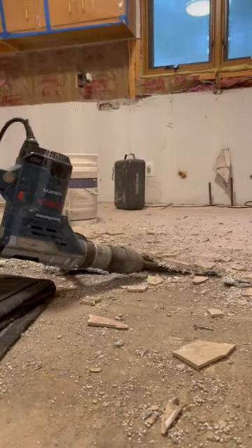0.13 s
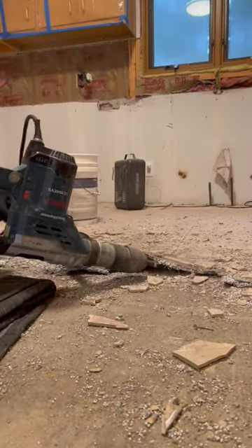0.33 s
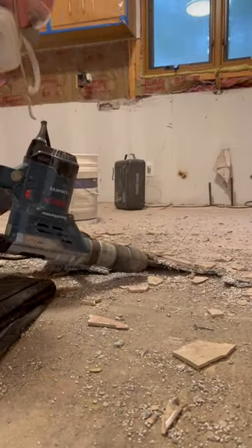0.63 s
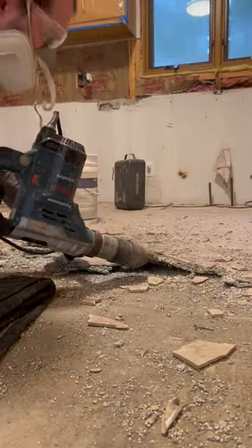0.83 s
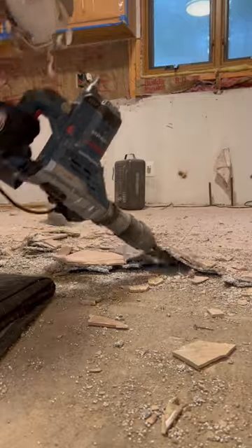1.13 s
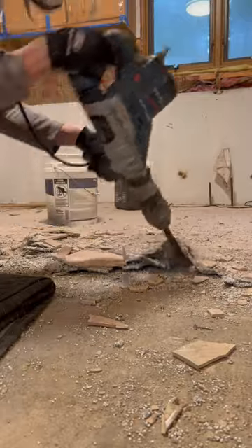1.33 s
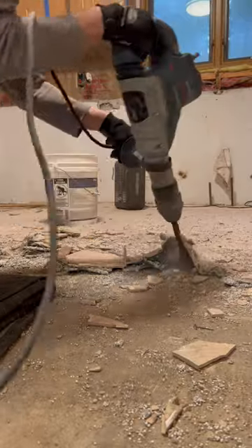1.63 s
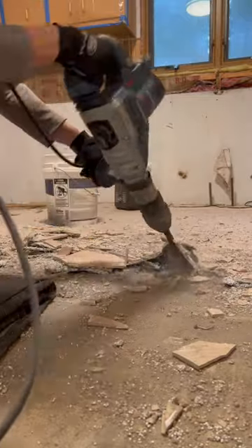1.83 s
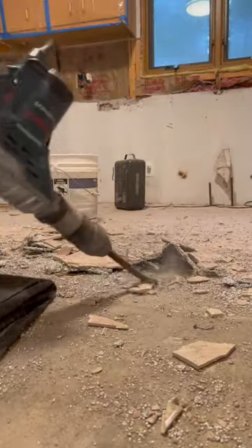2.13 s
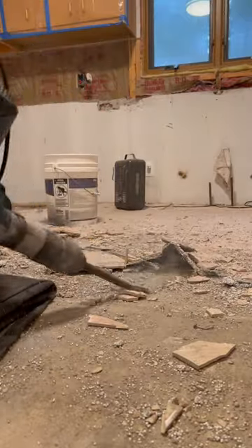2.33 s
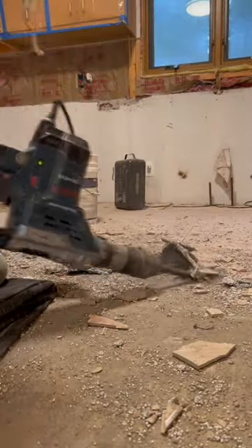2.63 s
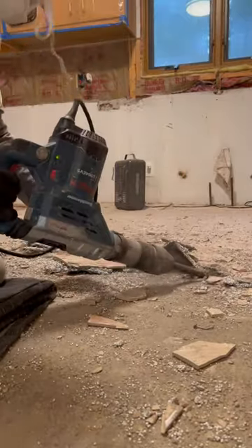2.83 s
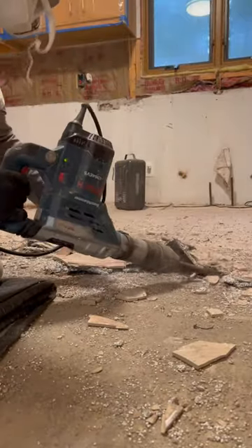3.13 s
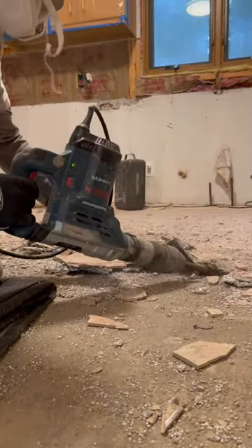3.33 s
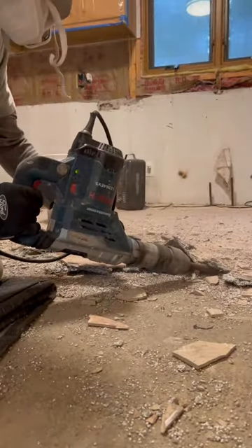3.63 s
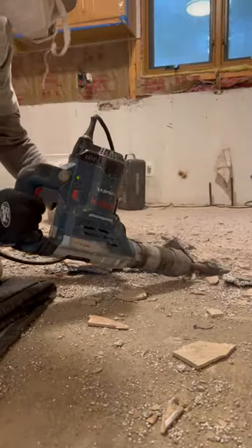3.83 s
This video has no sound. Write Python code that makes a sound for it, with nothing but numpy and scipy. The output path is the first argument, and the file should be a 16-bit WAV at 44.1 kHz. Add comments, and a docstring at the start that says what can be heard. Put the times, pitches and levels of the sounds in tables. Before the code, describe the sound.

Electric chipping hammer clatters in fast metallic bursts on a tiled floor, its motor rushing throughout.

```python
"""Four bursts of hard clatter, about 47 blows a second: an electric demolition hammer chisels tile in a bare room.
Each blow excites low floor modes, a filtered knock on the tile with buzzing loose pieces, and a steel chisel
that clanks, cracks and rings. Underneath, the motor runs throughout as filtered air noise and whining tones.
Slabs thud and shards snap as decaying tones and noise; before the second burst the chisel drags over rubble."""
import sys
import numpy as np
from scipy import signal
from scipy.fft import rfft, irfft
from scipy.io import wavfile
from scipy.ndimage import uniform_filter1d

SR = 44100
rng = np.random.default_rng(int(sys.argv[2]) if len(sys.argv) > 2 else 0)


def dump(signal):
    """Clip the signal to [-1, 1] and save it as 16-bit WAV at the path in sys.argv[1]."""
    limited = np.clip(np.atleast_2d(signal).T, -1, 1)
    pcm = np.round(limited * 32767).astype(np.int16)
    wavfile.write(sys.argv[1], SR, pcm)


N = 176400
TIME = np.arange(N) / SR
ROOM_T60_S = 0.25

# Hammer speed. Each row: time in seconds, blows per second.
SPEED = [(0.0, 47.7), (0.42, 46.84), (0.52, 48.44), (0.7, 48.5), (1.0, 47.3), (1.53, 47.01), (1.6, 49.61),
         (1.72, 45.76), (1.92, 44.93), (2.1, 48.4), (2.72, 45.86), (2.79, 49.19), (2.88, 45.55),
         (3.3, 47.27), (3.58, 46.93), (3.72, 49.79), (3.83, 50.39), (3.94, 44.22)]
# Strength of the blows, ahead of the mix gain of each part. Each row: time in seconds, floor thump in dB,
# tile knock in dB, chisel in dB, tip crack in dB.
EFFORT = [(0.01, -47.5, -37, -31, -37), (0.455, -49, -41, -35, -31.5), (1.574, -29, -28, -30.5, -24.5),
          (1.656, -19, -25, -31.5, -30), (1.677, -35.5, -29, -30.5, -54), (1.963, -36, -43.5, -35, -43),
          (2.683, -52, -36.5, -32, -27.5), (2.73, -35, -31.5, -34, -27), (2.87, -23, -23, -30.5, -22),
          (3.2, -24.5, -22.5, -26, -25), (3.326, -33, -27.5, -32.5, -25.5), (3.347, -56, -27.5, -50, -52),
          (3.39, -53, -35, -33.5, -29), (3.411, -38.5, -29.5, -29, -20.5), (3.58, -40, -30, -30.5, -26),
          (3.68, -50, -35, -49, -30), (3.766, -42, -29, -32, -23.5), (3.89, -34, -25, -31, -20.5),
          (3.953, -29, -26.5, -32, -28)]


def amp(db):
    """Decibels to gain."""
    return 10 ** (np.asarray(db) / 20)


def unit(x):
    """Scales to rms 1."""
    return x / np.sqrt(np.mean(x ** 2))


def curve(table, t=TIME, order=1):
    """Reads one column of a table along its first, in straight lines between rows."""
    rows = np.array(table, float)
    return np.interp(t, rows[:, 0], rows[:, order])


def convolve(x, response):
    """Filters and cuts to the scene's length."""
    return signal.fftconvolve(np.atleast_2d(x), np.atleast_2d(response), axes=1)[:, :N]


def colour(x, points, size=4096):
    """Minimum-phase filter of energy 1 whose spectrum follows the given points."""
    hz, db = np.transpose(points)
    log_hz = np.log(abs(np.fft.fftfreq(size, 1 / SR)) + 1)
    gain = amp(np.interp(log_hz, np.log(hz), db))
    spectrum = np.exp(np.conj(signal.hilbert(np.log(gain))))
    response = np.fft.ifft(spectrum).real[:size // 2]
    return convolve(x, response / np.linalg.norm(response))


def band(x, hz, width_hz):
    """A steep resonance, scaled to rms 1."""
    detuning = (np.fft.rfftfreq(N, 1 / SR) - hz) / width_hz
    return unit(irfft(rfft(x) / (1 + 1j * detuning) ** 2, N))


def pair(side=0.12):
    """Noise at two microphones; side is the part that they do not share."""
    a, b = rng.standard_normal((2, N))
    return unit(np.array([a + side * b, a - side * b]))


def reverb(x, wet_db, side=0.41, t60=ROOM_T60_S):
    """Direct sound plus a diffuse, exponentially dying tail, scaled back for the added power."""
    tail = (pair(side) * amp(-60 * TIME / t60))[:, :SR // 2]
    tail *= amp(wet_db) / np.linalg.norm(tail[0])
    tail[:, 0] = 1  # direct sound
    return convolve(x, tail) / np.sqrt(1 + amp(wet_db) ** 2)


def floor_echo(x):
    """Adds the reflection off the floor, whose comb of peaks sweeps as the hammer is raised and lowered."""
    # First peak of the comb as the vents swing over the floor. Each row: time in seconds, frequency in Hz.
    swing = [(1.05, 2047), (1.4, 1393), (2.15, 1435), (2.65, 1845)]
    echo_db = -9
    late = [np.interp(TIME - 1 / curve(swing), TIME, channel) for channel in x]
    return unit(x + amp(echo_db) * np.array(late))


def motor():
    """Cooling air rushes through the vents; the heavy rotor whines smoothly; the piston shakes the housing."""
    # Colour of the cooling air. Each row: frequency in Hz, relative level in dB per Hz.
    rush = [(25, -30.5), (700, -10.5), (1700, -3), (6000, -5), (10200, -10.5), (12000, -26)]
    # Motor levels. Each row: time in seconds, rush in dB, fan in dB (the fan noise is then halved).
    motor_levels = [(.4, -34.5, -53), (.52, -35, -45.5), (1.05, -34.5, -37.5), (1.25, -35, -43),
                    (2.15, -33, -47.5), (3, -32, -36), (3.8, -32.5, -41)]
    # Motor tones. Each row: multiple of the shaft speed, level in dB relative to the fan column.
    whine_tones = [(1, -20.5), (7, -1)]
    # Shaking of the housing at the stroke rate. Each row: time in seconds, level in dB.
    shake = [(.9, -62), (1.38, -40.5), (2.2, -63), (3.05, -48), (3.4, -73)]
    shaft_per_blow, gear_order, gear_db = 6.24, 17, -54  # shaft turns per blow; gear tone per shaft turn

    # The rotor's inertia smooths the speed over a fifth of a second
    turns = np.cumsum(uniform_filter1d(curve(SPEED), size=SR // 5)) / SR
    stroke = np.sin(2 * np.pi * turns)
    fan_gain = amp(curve(motor_levels, order=2))

    air = floor_echo(colour(pair(side=0.49), rush))
    air = air * (1 + 0.15 * stroke) * amp(curve(motor_levels))
    air += band(pair(), hz=1940, width_hz=95) * fan_gain / 2

    wobble = 0.0036 * band(rng.standard_normal(N), hz=6.5, width_hz=15)  # shaft turns
    shaft = shaft_per_blow * turns + wobble
    whine = sum(amp(db) * np.sin(2 * np.pi * round(k) * shaft) for k, db in whine_tones) * fan_gain
    whine += amp(gear_db) * np.sin(2 * np.pi * gear_order * shaft)
    shaking = amp(curve(shake)) * stroke
    return air + np.sqrt(2) * (reverb(whine, wet_db=-7.5) + shaking)  # root 2: tone levels are rms


def rubble():
    """Slabs thud as they break loose, shards snap, and the chisel drags between them."""
    # Slabs breaking loose. Each row: start in seconds, level in dB, pitch in Hz, t60 in seconds.
    thuds = [(1.656, -5, 281, 0.033), (1.661, -15, 106, 0.13), (3.183, -25, 74, 0.12),
             (3.331, -7, 257, 0.018)]
    # Snapping and scraping of shards. Each row: start in seconds, onset level in dB, centre in Hz,
    # decay in seconds (to 1/e).
    shards = [(1.097, -31, 1020, 0.016), (1.279, -35, 1200, 0.12), (1.655, -2.5, 720, 0.0021),
              (1.654, -15, 3000, 0.0013), (3.887, -15.5, 1220, 0.0042)]
    # Chisel dragged through rubble. Each row: start in seconds, end in seconds, level in dB.
    drags = [(1.085, 1.561, -45.5)]
    out = np.zeros(N)
    for start, db, hz, t60 in thuds:
        t = np.maximum(TIME - start, 0)
        out += amp(db - 60 * t / t60) * np.sin(2 * np.pi * hz * t)
    for start, db, hz, decay in shards:
        t = np.maximum(TIME - start, 0)
        snap = (t > 0) * np.exp(-t / decay)
        out += amp(db) * snap * band(rng.standard_normal(N), hz, hz)
    impacts = rng.standard_normal(N) * (rng.random(N) < 250 / SR)  # about 250 grains a second
    grains = band(impacts, hz=272, width_hz=320)
    for start, end, db in drags:
        out += amp(db) * grains * ((TIME > start) & (TIME < end))
    return reverb(out, wet_db=-13.0)


def blow_times(turns):
    """One blow per piston stroke while the chisel is pressed down."""
    # Bursts of blows. Each row: first blow in seconds, end in seconds.
    bursts = [(.0102, .465), (1.5735, 1.955), (2.6826, 3.632), (3.7052, 3.962)]
    times = []
    for burst in bursts:
        first, last = np.interp(burst, TIME, turns)
        times.append(np.interp(np.arange(first, last), turns, TIME))
    return np.concatenate(times)


def clicks(times, order):
    """One impulse per blow, as strong as a column of EFFORT asks, with 1 dB of random scatter."""
    db = curve(EFFORT, times, order=order) + rng.standard_normal(len(times))
    per_blow = np.sqrt(SR / curve(SPEED, times))  # turns an rms level into an impulse height
    return np.bincount((times * SR).astype(int), amp(db) * per_blow, N)[:N]


def contact(hits, decay_s, grit):
    """A clean impact and a short spray of crushing grit; grit is the spray's share of the power."""
    t = TIME[:SR // 20]
    shape = t * np.exp(-2 * t / decay_s)
    power = abs(convolve(hits ** 2, shape / shape.sum()))
    return np.sqrt(1 - grit) * hits + np.sqrt(grit * power) * pair(side=0.43)


def floor_thump(times):
    """The floor booms in its low modes, each a decaying sine."""
    # Floor modes. Each row: frequency in Hz, relative level in dB, t60 in seconds.
    floor_modes = [(146.5, 10, 0.18), (199, 7.5, 0.18), (275.9, -1, 0.49)]
    boom = sum(amp(db - 60 * TIME / t60) * np.sin(2 * np.pi * hz * TIME) for hz, db, t60 in floor_modes)
    thump = convolve(clicks(times, order=1), -boom / np.linalg.norm(boom))
    return amp(-0.5) * reverb(thump, wet_db=-11, side=0.05)


def tile_knock(times):
    """The dull knock of the tip on tile and mortar; loose pieces buzz at their own pitch."""
    # Colour of the knock. Each row: frequency in Hz, relative level in dB per Hz.
    knock_colour = [(90, -27.5), (430, 1.5), (700, 6.5), (1400, -7.5), (2100, -5.5), (12000, -75.5)]
    # Loose pieces of tile buzzing under the tip. Each row: start in seconds, end in seconds, pitch in Hz.
    tiles = [(0, .42, 1157), (0, .45, 263), (1.55, 1.93, 583), (1.66, 1.93, 3840), (3.4, 3.63, 1980),
             (3.4, 3.63, 582), (3.74, 3.86, 438)]
    tile_db, decay_cycles = -4, 1.27
    hits = clicks(times + 0.00055, order=2)
    knock = colour(contact(hits, decay_s=0.0038, grit=0.2), knock_colour)
    for start, end, hz in tiles:
        cycles = hz * TIME
        buzz = cycles * np.exp(-cycles / decay_cycles) * np.sin(2 * np.pi * cycles)
        loose_hits = hits * (TIME > start) * (TIME < end)
        knock = knock + amp(tile_db) * convolve(loose_hits, buzz / np.linalg.norm(buzz))
    balance = amp([[-1], [1.3]])  # left, right
    return balance * reverb(knock, wet_db=0.5, side=0.48, t60=0.16)


def clang(times):
    """Each blow sets the chisel's modes swelling and dying within milliseconds, more so when it bites the floor."""
    # Lengthwise modes of the chisel. Each row: frequency in Hz, level in dB, swell in seconds.
    steel = [(4550, 1, 0.0004), (8330, -3, 0.00055)]
    bite = 0.17  # extra clang in dB per dB of floor thump
    out, t, thump_db = np.zeros(N), TIME[:SR // 50], curve(EFFORT)
    hits = clicks(times, order=3) * amp(bite * (thump_db - thump_db.mean()))
    for hz, db, swell in steel:
        shape = t ** 2 * np.exp(-t / swell)
        envelope = convolve(hits, shape / np.linalg.norm(shape))[0]
        wander = 1.28 * band(rng.standard_normal(N), hz=0, width_hz=150)  # radians
        phase = 2 * np.pi * hz * TIME + wander
        out += amp(db) * envelope * np.sqrt(2) * np.sin(phase)
    return out


def chisel(times):
    """The steel clangs, cracks at the tip and rings on as it rebounds; it reaches the left side a sample late."""
    # Colours of the steel's clank, the tip's crack and the ring.
    # Each row: frequency in Hz, relative level in dB per Hz.
    clank_colour = [(1000, -13.5), (2600, -0.5), (4550, -2), (5200, -29), (13000, -38)]
    crack_colour = [(2500, -25), (6650, -12), (7150, -1), (7700, 1.5), (10400, -13), (12000, -34),
                    (15800, -21)]
    ring_colour = [(7000, -25.5), (8050, -13), (8500, 0.5), (9000, -21.5), (11000, -61)]
    ring_t60_s, rebound_s, rebound_db = 0.49, 0.009, -14
    rebounds = times + rebound_s * (1 + 0.074 * rng.standard_normal(len(times)))
    hits = clicks(times, order=3) + amp(rebound_db) * clicks(rebounds, order=3)
    tip_hits = clicks(times, order=4)

    clank = colour(contact(hits, decay_s=0.0027, grit=1), clank_colour)
    crack = colour(contact(tip_hits, decay_s=0.0013, grit=0.79), crack_colour)
    ring = colour(contact(hits, decay_s=0.0022, grit=0.46), ring_colour)
    ring = reverb(ring, wet_db=5, t60=ring_t60_s)
    strike = reverb(amp(-4) * clank + amp(2.5) * crack, wet_db=-4.5)
    modes = reverb(clang(times - 0.0006), wet_db=-3.5)  # early, as the modes take time to swell
    left, right = strike + modes + amp(6.5) * ring
    return np.array([np.roll(left, 1), right])


def scene():
    """The hammer at work on the floor: motor and rubble under the blows."""
    turns = np.cumsum(curve(SPEED)) / SR
    times = blow_times(turns)
    return motor() + rubble() + floor_thump(times) + tile_knock(times) + chisel(times)


def record(dry):
    """Peaks are rounded off, the deep bass is cut, the treble drops away at moments, then the band limit."""
    # Moments of dull treble. Each row: start in seconds, end in seconds.
    dull_spans = [(0, .447), (1.675, 1.955), (3.335, 3.403)]
    x = signal.lfilter(*signal.butter(2, 35, "high", fs=SR), np.tanh(dry))
    dull = sum(((TIME >= a) & (TIME < b)) * 1. for a, b in dull_spans)
    dull = uniform_filter1d(dull, size=200)  # short crossfades
    # Low-pass with a half-depth dip in the upper treble
    dip = signal.firwin(151, [5050, 6900], pass_zero=False, fs=SR)
    muffle = signal.firwin(151, 8900, fs=SR) - 0.5 * dip
    x = x + dull * (signal.oaconvolve(x, muffle[None], "same") - x)
    band_limit = signal.firwin(511, 16050, window="blackman", fs=SR)
    return signal.oaconvolve(x, band_limit[None], "same")


dry = scene()
out = record(dry)
dump(out)
```